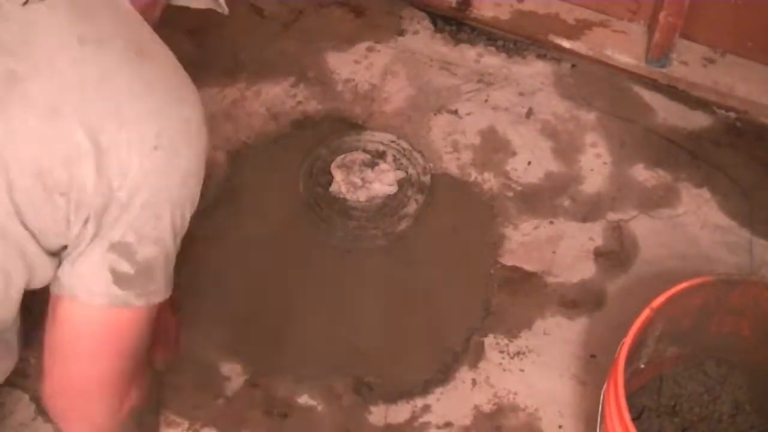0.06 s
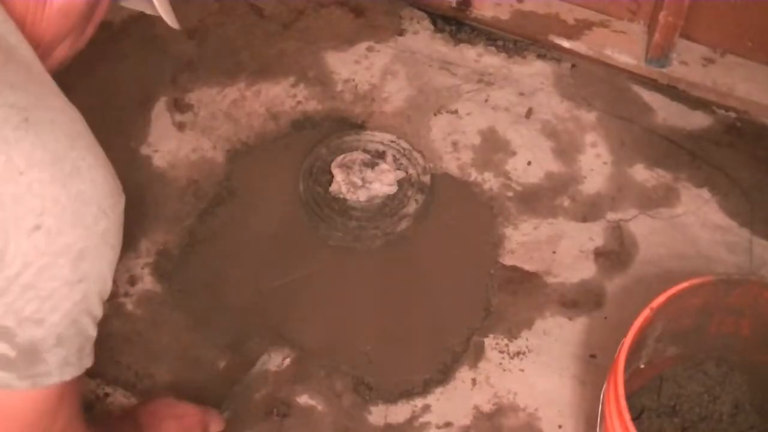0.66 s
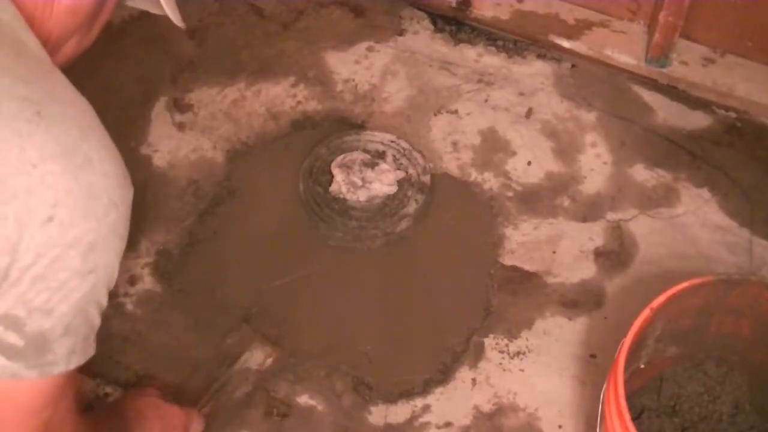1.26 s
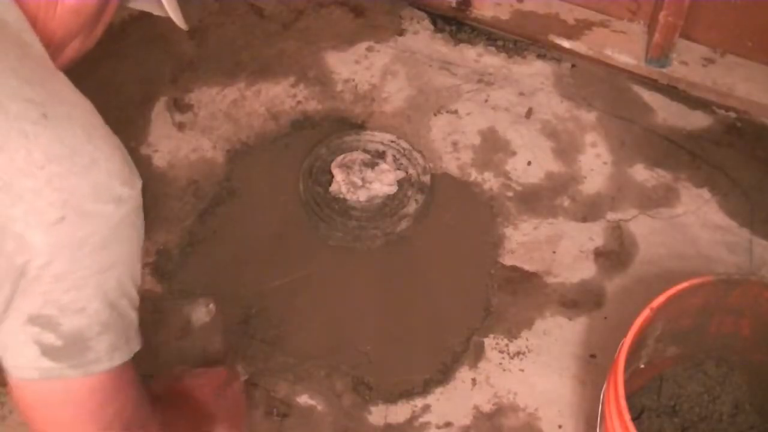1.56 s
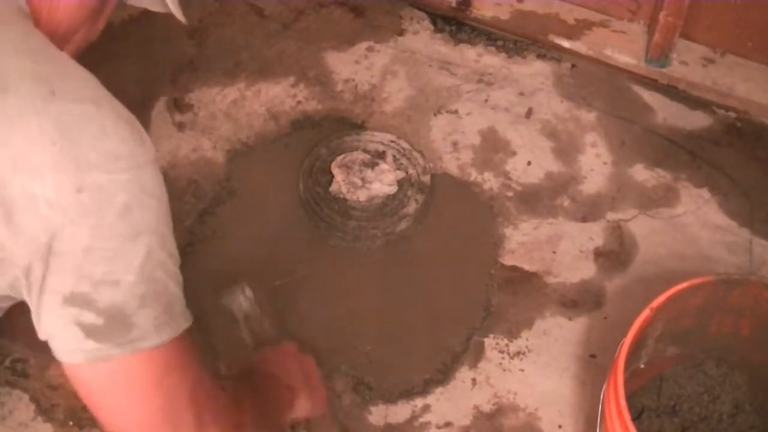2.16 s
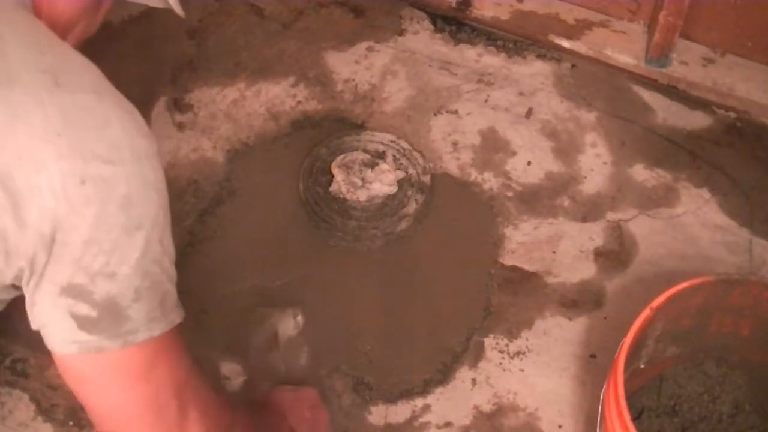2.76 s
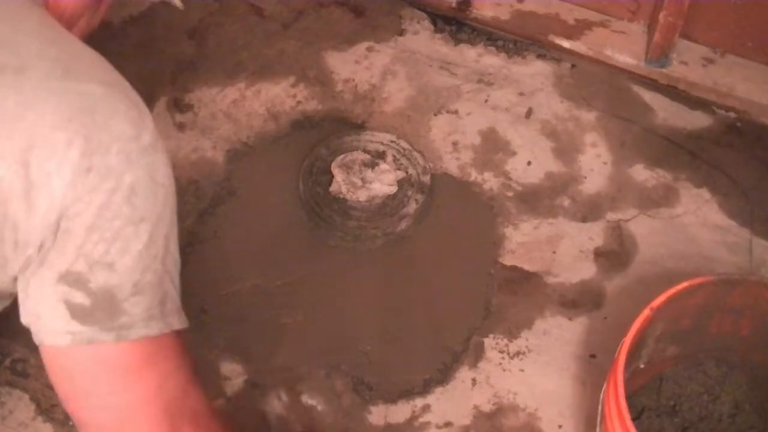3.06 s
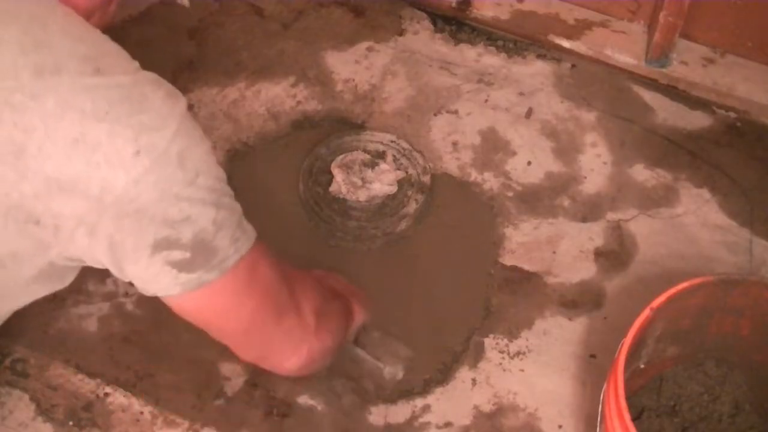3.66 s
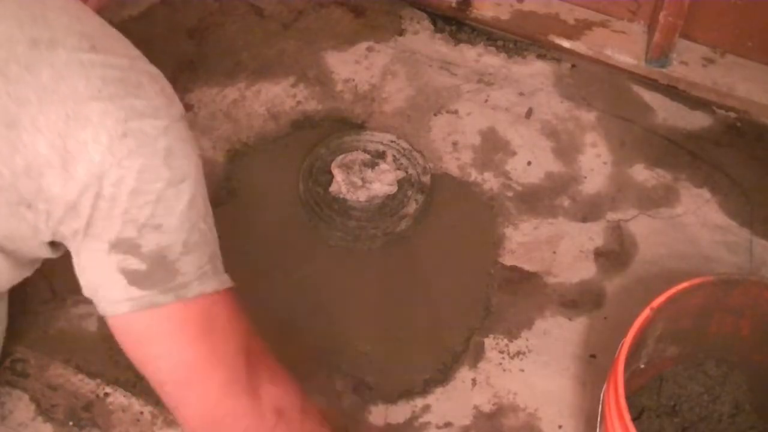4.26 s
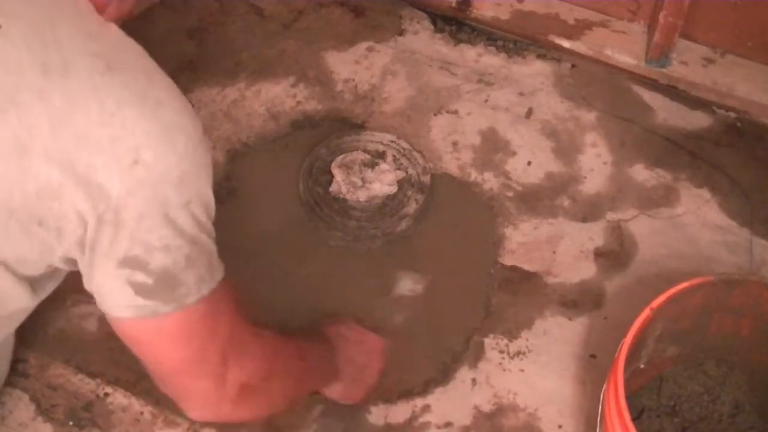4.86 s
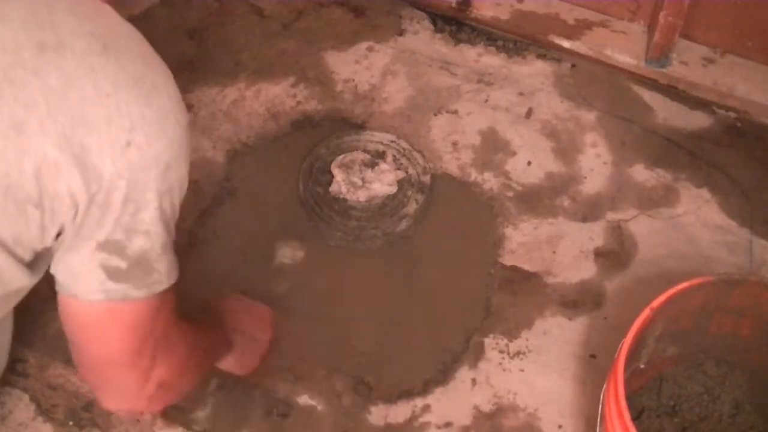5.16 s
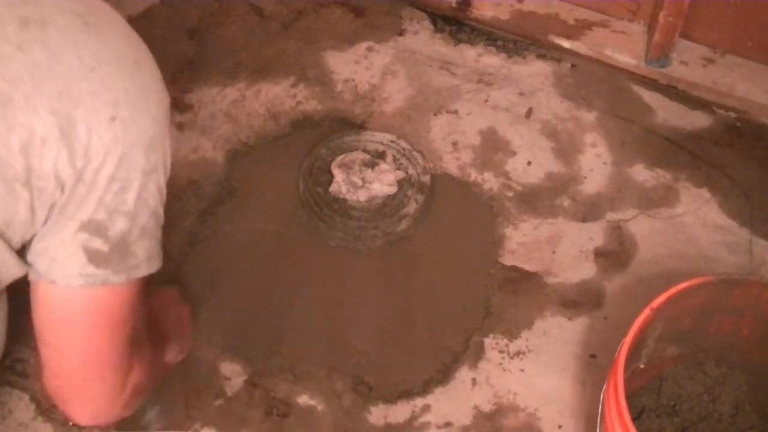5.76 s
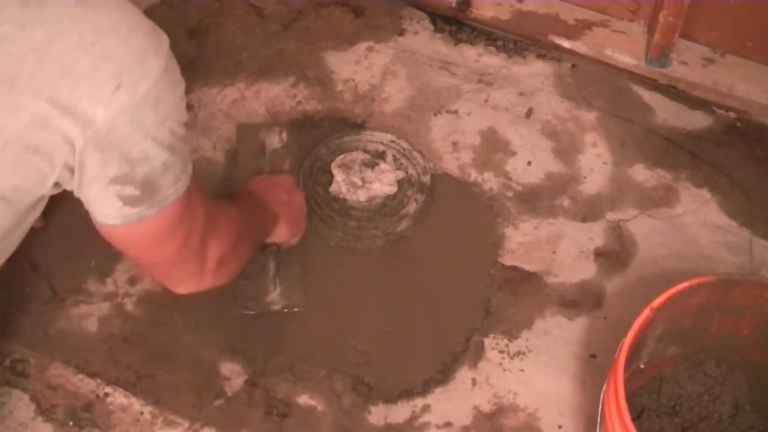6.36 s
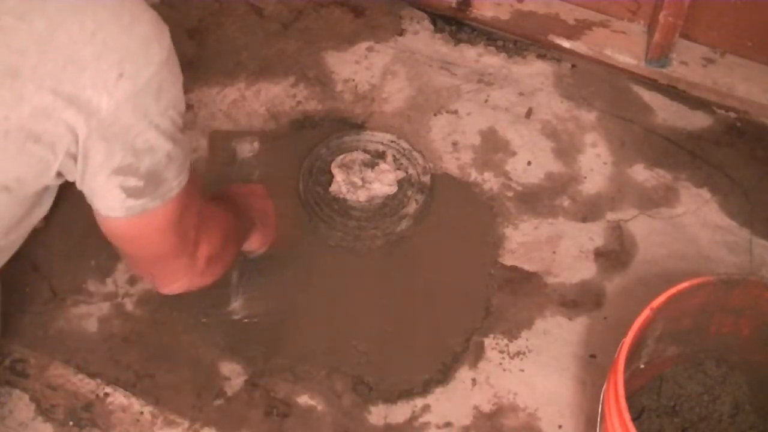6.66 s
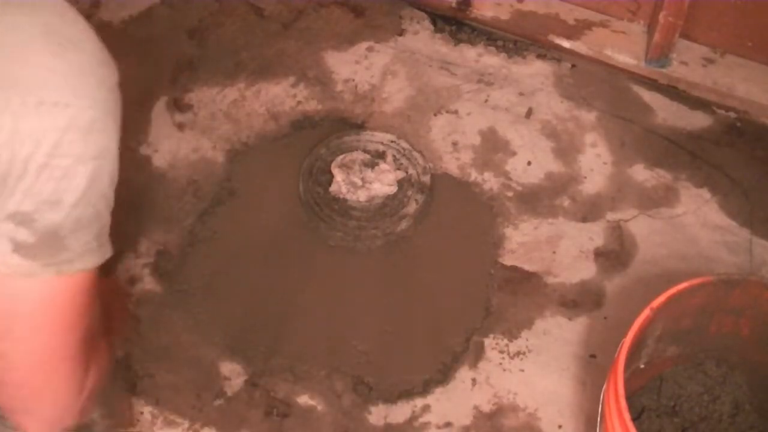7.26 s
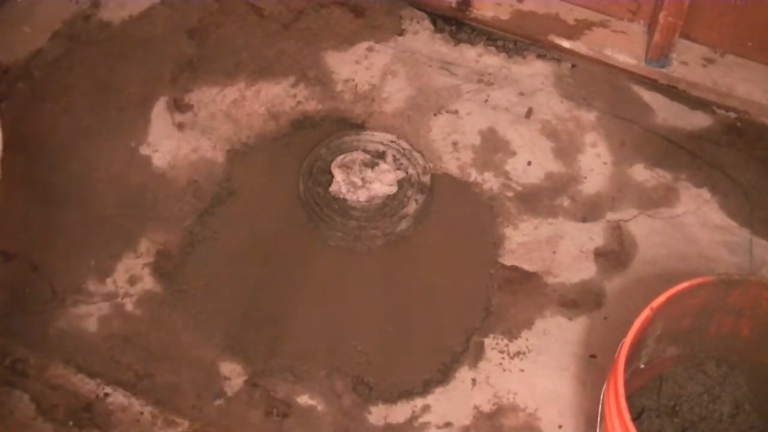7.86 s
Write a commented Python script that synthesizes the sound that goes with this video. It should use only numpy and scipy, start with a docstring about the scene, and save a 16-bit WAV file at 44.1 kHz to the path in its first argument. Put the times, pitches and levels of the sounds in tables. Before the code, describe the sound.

A steel trowel scrapes wet concrete in gritty strokes, with light metallic knocks, in a bare echoing room.

```python
"""Gritty scrapes and knocks: a steel hand trowel smooths wet concrete around a floor drain.
In each stroke sand catches under the blade and sets it ringing, its edge rasps, the paste drags below.
The blade knocks as it lands or meets a stone; at the end it is laid on the hard floor and rings freely.
The bare room echoes, almost mono, over a faint steady hiss."""
import sys
import numpy as np
from scipy import signal
from scipy.fft import rfft, irfft
from scipy.io import wavfile
from scipy.ndimage import uniform_filter1d, minimum_filter1d

SR = 44100
rng = np.random.default_rng(int(sys.argv[2]) if len(sys.argv) > 2 else 0)


def inscribe(sig):
    """Save sig as 16-bit PCM at rate SR to the path in sys.argv[1].

    A 1-D sig is mono; a 2-D sig holds one channel per row.
    Samples are clipped to [-1, 1] before scaling.
    """
    pcm = np.round(np.clip(np.atleast_2d(sig).T, -1, 1) * 32767)
    wavfile.write(sys.argv[1], SR, pcm.astype(np.int16))


N = 349267
TIME = np.arange(N) / SR
START_S, SET_DOWN_S = 0.526, 7.665


def from_db(db):
    """Decibels to gain."""
    return 10 ** (np.asarray(db) / 20)


def unit_rms(x):
    """Scale to rms 1."""
    return x / np.sqrt(np.mean(x ** 2) + 1e-20)


def unit_energy(x):
    """Scale an impulse response to keep the power of white noise."""
    return x / np.sqrt(np.sum(x ** 2))


def evened(x, size=2200):
    """Hold the slow level at rms 1, keeping the fast grain."""
    return x / np.sqrt(np.maximum(uniform_filter1d(x ** 2, size), 1e-12))


def at_hz(points, hz):
    """Interpolate a spectrum on a log-frequency axis."""
    known_hz, values = np.transpose(points)
    return np.interp(np.log(np.maximum(hz, 1)), np.log(known_hz), values)


def through(x, response):
    """Convolve, keeping the length."""
    return signal.oaconvolve(x, response)[:len(x)]


def response_of(spectrum, size=4096):
    """Minimum-phase impulse response of a spectrum."""
    gain = from_db(at_hz(spectrum, np.fft.rfftfreq(size, 1 / SR)))
    cepstrum = irfft(np.log(gain))
    cepstrum[1:size // 2] *= 2
    cepstrum[size // 2 + 1:] = 0
    return irfft(np.exp(rfft(cepstrum)))[:size // 2]


def colour(x, spectrum):
    """Shape by a spectrum; white input keeps its power."""
    return through(x, unit_energy(response_of(spectrum)))


def resonance(hz, width_hz):
    """Two-pole filter, peak gain 1."""
    r = np.exp(-np.pi * width_hz / SR)
    return (1 - r * r) / 2 * np.array([1, 0, -1]), [1, -2 * r * np.cos(2 * np.pi * hz / SR), r * r]


def ring(x, modes):
    """Drive resonances in parallel."""
    return sum(from_db(db) * signal.lfilter(*resonance(hz, width_hz), x) for hz, width_hz, db in modes)


def glide(x, hz, width_hz, size=256):
    """Resonance with a moving centre, stepped per block."""
    out, state = np.zeros(N), np.zeros(2)
    for i in range(0, N, size):
        out[i:i + size], state = signal.lfilter(*resonance(hz[i], width_hz), x[i:i + size], zi=state)
    return out


def band(x, low_hz, high_hz):
    """Steep band-pass."""
    return signal.sosfilt(signal.butter(4, [low_hz, high_hz], "band", fs=SR, output="sos"), x)


def drift(rate_hz):
    """Smooth random wander, rms 1."""
    lowpass = signal.butter(2, rate_hz, fs=SR, output="sos")
    return unit_rms(signal.sosfilt(lowpass, rng.standard_normal(N + SR))[SR:])


def grains(per_s, spread_db):
    """Random clicks of uneven size, rms 1."""
    sizes = from_db(spread_db * np.minimum(rng.exponential(1, N), 5))
    return unit_rms(sizes * rng.choice([-1, 1], N) * (rng.random(N) < per_s / SR))


def hand(touch_db=-23.5, sag_hz_per_s=450, sand_lasts=0.76, sand_fade_db_per_s=43):
    """Each push swells, eases and lifts while the blade rolls onto its edge and back."""
    # pushes: (start [s], swell [s], length [s], pressure [dB], easing [dB/s], lift [dB/s],
    #   peak tilt [0 flat, 1 on edge], tilt peak delay [s], tilt half-width [s], flat ring [Hz],
    #   sand [dB], paste [dB], paste resonance [Hz])
    strokes = [ (0.522, 0.0044, 0.016, -22.5, 18, 136, 0.08, .02, .05, 1500, -3.5, 11, 890),
               (0.639, 0.0041, 0.085, -17.5, 57, 120, .1, 0.066, 0.039, 1470, -4.5, 3, 900),
               (0.694, 0.021, 0.11, -11.5, 41, 148, 0.29, 0.014, 0.015, 1460, 0.5, 5, 920),
               (0.761, 0.0286, 0.05, -11.5, 20, 108, 0.04, 0.018, 0.023, 1530, -6, 5.5, 625),
               (0.872, 0.015, 0.096, -17.5, 22, 138, 0.1, .07, 0.039, 1430, 1, 4, 740),
               (1.049, 0.014, 0.05, -19, 45, 112, 0.54, 0.017, 0.038, 1460, 3, 11.5, 860),
               (1.165, 0.022, 0.062, -12.5, -8, 285, 1, 0.054, 0.013, 1530, -0.5, -6.5, 820),
               (1.518, 0.066, 0.31, -16.5, -20.5, 116, 0.85, 0.16, 0.087, 1500, -1, -7, 900),
               (1.81, 0.03, 0.18, -11.5, 27, 72, .1, .02, .05, 1474, -1.5, 3.5, 800),
               (2.275, 0.0022, 0.28, -15, -1.5, 62, 0.7, 0.047, 0.02, 1495, 1, 2, 900),
               (2.835, 0.022, .17, -11, 11, 106, 0.88, 0.059, 0.044, 1600, -3, -2.5, 880),
               (3.375, 0.0067, 0.15, -9.5, 35, 137, 0.63, 0.084, 0.097, 1630, -6.5, -6, 880),
               (3.532, 0.011, 0.043, -16.5, 17, 130, 0.39, .02, 0.17, 1580, 3, 7.5, 845),
               (3.688, .012, 0.093, -22, 30, 105, .8, 0.034, 0.095, 1730, 1.5, 4.5, 910),
               (3.787, 0.015, 0.43, -21.5, 19, 48, 0.1, .02, 0.45, 1630, 6.5, 4, 706),
               (4.038, 0.033, 0.27, -14, -5, 103, 0.13, 0.11, 0.1, 1474, -2.5, -1, 740),
               (4.684, 0.013, 0.097, -12, 3, 110, 0.068, 0.015, 0.071, 1450, -4, 2, 950),
               (4.777, 0.024, .13, -12.5, 1, 117, 0.6, 0.15, 0.088, 1280, -1, 11, 910),
               (4.904, 0.023, 0.38, -14.5, -4.5, 110, 0.63, 0.059, 0.6, 1490, 1, 6.5, 970),
               (5.166, 0.11, 0.41, -10.5, 4, 82, 0.71, 0.12, 0.19, 1530, -3.5, 2, 1000),
               (6.277, 0.44, .58, -16, -2, 113, 0.91, .20, 0.21, 1480, 3.5, 9, 990),
               (6.782, 0.062, .24, -14, -5, 84, 0.34, .08, 0.1, 1440, -2, 7.5, 1010),
               (7.280, .02, 0.3, -47.5, -2.5, 62.5, 0.055, .1, 0.04, 1450, 6.5, 17, 880)]
    clock = TIME[::32]
    pushes = []
    for (start_s, swell_s, length_s, db, ease_db_per_s, lift_db_per_s,
         peak_tilt, tilt_delay_s, tilt_width_s, flat_hz, sand_db, paste_db, paste_hz) in strokes:
        age = clock - start_s
        lifted_s = np.maximum(age - length_s, 0)
        swell_db = touch_db * np.clip(1 - age / swell_s, 0, 1)
        release_db = ease_db_per_s * np.clip(age, 0, length_s) + lift_db_per_s * lifted_s
        pressure = (age >= 0) * from_db(db + swell_db - release_db)
        tilt = peak_tilt * np.exp(-((age - tilt_delay_s) / tilt_width_s) ** 2)
        ring_hz = flat_hz - sag_hz_per_s * lifted_s
        # the sand hiss dies first
        hiss_db = sand_db - sand_fade_db_per_s * np.maximum(age - sand_lasts * length_s, 0)
        pushes.append(np.broadcast_arrays(pressure, tilt, ring_hz, hiss_db, paste_db, paste_hz))
    pushes = np.array(pushes)
    weight = pushes[:, :1] ** 4 + 1e-40   # the firmest push holds the blade
    controls = (weight * pushes).sum(axis=0) / weight.sum(axis=0)
    return [np.interp(TIME, clock, control) for control in controls]


def blade_ring(slips, ring_hz, coarse_db=-6.0):
    """Fine and coarse grains pluck the blade; its length in the paste decides which modes speak."""
    # steel damped by paste: (frequency [Hz], width [Hz], gain [dB])
    blade_modes = [(1258, 110, -4), (1450, 59, -5.5), (1425, 220, 1), (1530, 260, -8.5), (1638, 36, 5),
                   (1840, 120, -46)]
    fine = grains(per_s=6000, spread_db=-0.5)
    coarse = from_db(coarse_db) * grains(per_s=140, spread_db=-0.5)
    drive = glide(slips * (fine + coarse), ring_hz, width_hz=320)
    return band(ring(drive, blade_modes), low_hz=1115, high_hz=1884)


def edge_rasp(slips, edge_hz):
    """Grains drive the edge resonance, which moves with the tilt."""
    grit = slips * grains(per_s=4000, spread_db=2.8)
    return band(glide(grit, edge_hz, width_hz=300), low_hz=1600, high_hz=3200)


def paste_drag(slips, hollow_hz):
    """The hollow between blade and paste opens and closes."""
    # dragged paste: (frequency [Hz], relative level [dB])
    paste_spectrum = [(25, 3), (130, -13.5), (240, -11), (400, -4.5), (530, 0.5), (660, -1), (900, 2.5),
                      (1100, 5.5), (1500, 7.5), (3000, -52)]
    grit = slips * grains(per_s=3100, spread_db=2.0)
    return colour(glide(grit, hollow_hz, width_hz=650), paste_spectrum)


def sand_hiss(slips, ping_db=-11.5):
    """Sand hisses under the steel; single hard grains squeak in narrow high tones."""
    # grain squeaks: (frequency [Hz], width [Hz], relative level [dB])
    ping_modes = [(2830, 130, 18.5), (3176, 59, -7.5), (4280, 67, -16), (4560, 210, -3), (7770, 150, 6.5),
                  (8000, 160, -24)]
    # sliding sand: (frequency [Hz], relative level [dB])
    sand_spectrum = [(900, -39.5), (2000, 2.5), (2850, -2), (3250, 2.5), (3650, -2), (4450, 1),
                     (5700, -8.5), (6700, -8), (7650, -8.5), (9300, -12.5), (11500, -20), (16000, -28.5)]
    pings = np.zeros(N)
    for hz, width_hz, db in ping_modes:
        hits = grains(per_s=90, spread_db=4.0)
        pings += from_db(db) * unit_rms(signal.lfilter(*resonance(hz, width_hz), hits))
    hiss = colour(slips * grains(per_s=9000, spread_db=2.5), sand_spectrum)
    return hiss + from_db(ping_db) * unit_rms(pings)


def scrape(wobble_rms_hz=25.8, slip_db=2.5, lump_db=2.0):
    """Sand catches and slips in clumps; the same slips drive blade, edge, paste and hiss."""
    pressure, tilt, ring_hz, hiss_db, paste_db, paste_hz = hand()
    wobble_hz = wobble_rms_hz * drift(rate_hz=23)   # the blade wobbles over lumps
    slips = from_db(slip_db * drift(rate_hz=130))
    # on edge the blade rings less, rasps more and sounds higher: (signal, level [dB])
    layers = [(blade_ring(slips, ring_hz + 200 * tilt + wobble_hz), -5.0 - 9.5 * tilt),
              (edge_rasp(slips, 1633 + 696 * tilt + wobble_hz), -10.5 + 1.5 * tilt),
              (paste_drag(slips, paste_hz), paste_db - 24),
              (sand_hiss(slips), hiss_db - 10.78 + 0.5 * tilt)]
    # lumps press on each part of the blade in turn
    return pressure * sum(evened(x) * from_db(db + lump_db * drift(rate_hz=34)) for x, db in layers)


def knocks(crush_s=0.0047, ring_db=-4.0, paste_thud_db=-34):
    """Each knock crushes a few grains: a dull steel ring, a crack and a weaker floor thud."""
    # blade lands or meets a stone: (time [s], level [dB], relative crack [dB])
    paste_knocks = [(0.5246, -25, -33), (0.6478, -12.5, -20), (0.6595, -16, -26), (0.7313, -12, -12),
                    (0.762, -12, -30), (0.7927, -7.5, -25), (1.216, -22, -19), (1.5309, -6.5, -16),
                    (1.5654, 1.5, -16.5), (1.6422, -5.5, -9.5), (1.702, -9, -4.5), (2.278, -2.5, -17),
                    (2.8478, -5.5, -9.5), (2.8975, -4, -17), (3.3811, -8.5, -11.5), (3.5615, -12.5, -8.5),
                    (3.715, -16, -14), (4.085, -9, -12.5), (4.1924, -5, -27), (4.7025, -6, -17),
                    (4.9848, -9, -20), (5.8303, -26, -40.5), (6.1713, -35.5, -20), (6.4026, -15, -12.5)]
    # struck steel, crushed grains, floor: (frequency [Hz], relative level [dB])
    steel_spectrum = [(300, -47), (1000, -14.5), (1400, 10.5), (1750, 2.5), (2200, 1), (3000, -2.5),
                      (6000, -19.5), (16000, -72)]
    crack_spectrum = [(100, -21), (1000, 7), (2000, 19), (3000, -26), (5500, 3.5), (8000, 10), (11000, 1),
                      (16000, -19)]
    thud_spectrum = [(30, -30), (130, -21), (200, -4), (400, -2), (560, 9.5), (900, 15), (1400, -3),
                     (4000, -25)]
    blows = [(*knock, paste_thud_db) for knock in paste_knocks] + rocking()
    steel, crack, thud = np.zeros((3, N))
    age = np.arange(SR // 20) / SR
    for time_s, db, crack_db, thud_db in blows:
        start = round(time_s * SR)
        span = slice(start, start + len(age))
        bursts = from_db(db) * rng.standard_normal((3, len(age))) * np.exp(-age / crush_s)
        steel[span] += from_db(ring_db) * bursts[0]
        crack[span] += from_db(crack_db) * bursts[1]
        thud[span] += from_db(thud_db) * bursts[2]
    return colour(steel, steel_spectrum) + colour(crack, crack_spectrum) + colour(thud, thud_spectrum)


def rumble(trowel, level_db=-48.5):
    """Faint low noise that follows the force of scrapes and knocks."""
    # rumble: (frequency [Hz], relative level [dB])
    rumble_spectrum = [(25, -1.5), (130, 1.5), (250, -3), (600, -14)]
    force = np.sqrt(np.maximum(uniform_filter1d(trowel ** 2, size=256), 0))
    return from_db(level_db) * colour(force * rng.standard_normal(N), rumble_spectrum)


def air(level_db=-63.0):
    """Faint steady hiss."""
    # background: (frequency [Hz], relative level [dB])
    air_spectrum = [(30, -29), (150, -2), (500, -13), (1500, -29), (4000, -5), (9000, -9), (16000, -22)]
    return from_db(level_db) * colour(rng.standard_normal(N), air_spectrum)


def reflections(early_db=1.0, early_t60_s=0.2, echoes_per_s=2500, late_db=-7.0, gap_s=0.0036):
    """Near walls answer densely and briefly; the whole room rings on, longest in the lows."""
    # room decay: (frequency [Hz], t60 [s])
    room_t60 = [(150, 3.9), (500, 1.96), (1400, 1.065), (3500, 1.126), (8000, 0.87), (15000, 0.1)]
    age = np.arange(SR + SR // 2) / SR
    hz = np.fft.rfftfreq(len(age), 1 / SR)
    white = rfft(rng.standard_normal(len(age)))
    late = 0
    for centre_hz, t60_s in room_t60:
        share = at_hz([(band_hz, band_hz == centre_hz) for band_hz, _ in room_t60], hz)
        late += irfft(white * share, len(age)) * from_db(-60 * age / t60_s)
    echoes = rng.standard_normal(len(age)) * (rng.random(len(age)) < echoes_per_s / SR)
    early = echoes * from_db(-60 * age / early_t60_s)
    arrived = age > gap_s
    return (from_db(early_db) * unit_energy(early * arrived)
            + from_db(late_db) * unit_energy(late * arrived))


def room(x, direct_db=1.0, standing_db=-2.0, low_turn_hz=1.2, high_turn_hz=11.0, split_hz=2600):
    """Direct sound, reflections and standing waves; only reflections differ between channels."""
    # standing waves: (frequency [Hz], width [Hz], gain [dB])
    room_modes = [(254, 3.6, -6), (369.5, 14, -1), (495, 20, -13), (572, 6.5, 3), (905, 17, -2)]
    # left-right difference: (frequency [Hz], side gain [dB])
    side_spectrum = [(60, -17), (250, -34), (700, -23.5), (2400, -16.5), (4400, -13), (8000, -18),
                     (14000, -100)]
    # as the trowel travels, one reflection pattern gives way to another, fastest for short waves
    moving = 0
    for kind, turn_hz in (("low", low_turn_hz), ("high", high_turn_hz)):
        part = signal.sosfilt(signal.butter(3, split_hz, kind, fs=SR, output="sos"), x)
        angle = 2 * np.pi * turn_hz * TIME + drift(turn_hz)
        moving += part * np.exp(1j * angle)
    wet = through(moving.real, reflections()) + through(moving.imag, reflections())
    mid = from_db(direct_db) * x + wet + from_db(standing_db) * ring(wet, room_modes)
    side = through(through(x, reflections()), response_of(side_spectrum))
    return np.array([mid + side, mid - side])


def rocking(gap_s=0.009, level_db=-11, loss_db=3, crack_db=-13.5, dulling_db=10, thud_db=-15.5):
    """The laid-down trowel rocks on the bare floor: three contacts, each weaker and duller."""
    return [(SET_DOWN_S + k * gap_s, level_db - k * loss_db, crack_db - k * dulling_db, thud_db)
            for k in range(3)]


def free_ring(level_db=-23.5):
    """Clear of the paste, the trowel rings longer when laid on the hard floor."""
    # free trowel: (frequency [Hz], relative level [dB], t60 [s])
    free_modes = [(189, -24, .15), (283, -25, 0.84), (559, -12.5, 0.24), (564, -18, 0.26), (1380, -7, 0.13),
                  (1674, 7, 0.13), (1770, -1, .06), (1830, 6, 0.041), (1900, 9, 0.049), (2865, -20, .1),
                  (3100, -5, 0.072), (3800, -11, 0.15), (4160, -9, 0.17)]
    age = np.maximum(TIME - SET_DOWN_S, 0)
    ringing = sum((-1) ** k * from_db(db - 60 * age / t60_s) * np.sin(2 * np.pi * hz * age)
                  for k, (hz, db, t60_s) in enumerate(free_modes))
    return from_db(level_db) * band(ringing, low_hz=160, high_hz=9000)


def scene(near_db=-8.0, pan_db=-0.19):
    """The trowel in the room; it is laid down close by, so more of that ring comes direct."""
    trowel = scrape() + knocks()
    laid_down = free_ring()
    mix = air() + room(trowel + rumble(trowel) + laid_down) + from_db(near_db) * laid_down
    return mix * from_db([[pan_db], [-pan_db]])


def record(dry, cutoff_hz=16100):
    """Silence until START_S, a fast peak limiter and a steep low-pass."""
    peak = np.maximum(np.abs(dry).max(axis=0), 1)
    gain = uniform_filter1d(minimum_filter1d(1 / peak, size=128), size=128)
    lowpass = signal.ellip(10, 0.2, 80, cutoff_hz, fs=SR, output="sos")
    return signal.sosfilt(lowpass, (TIME >= START_S) * dry * gain)


dry = scene()
out = record(dry)
inscribe(out)
```